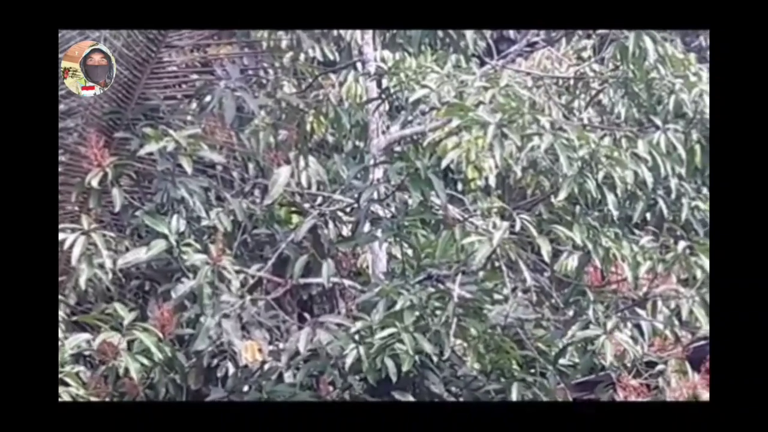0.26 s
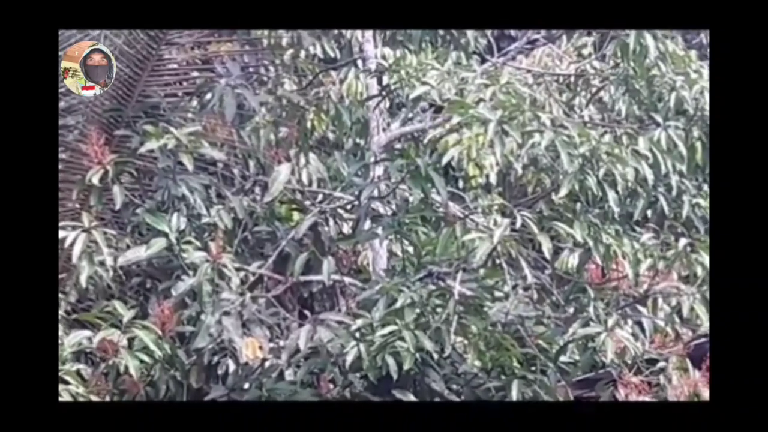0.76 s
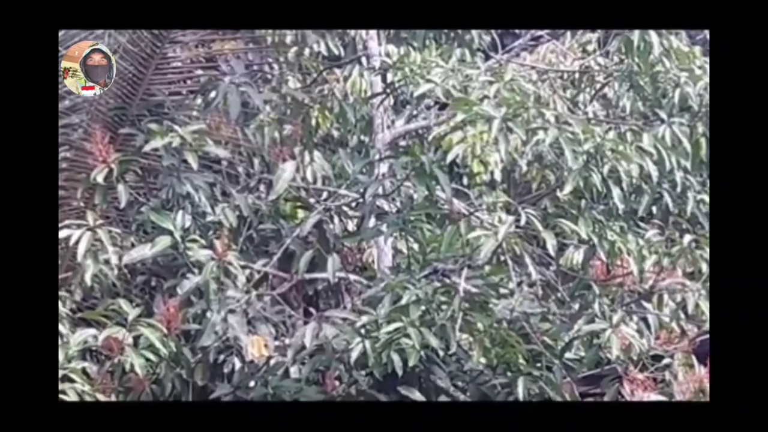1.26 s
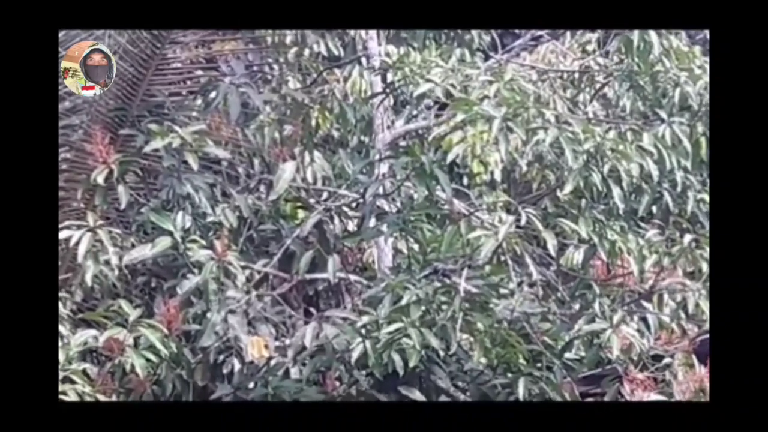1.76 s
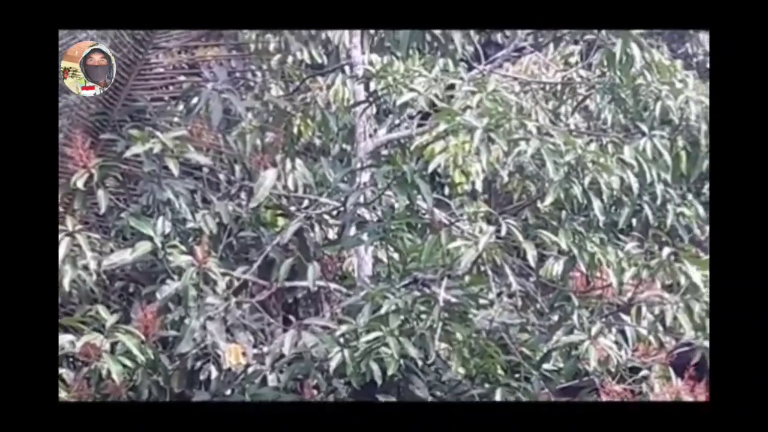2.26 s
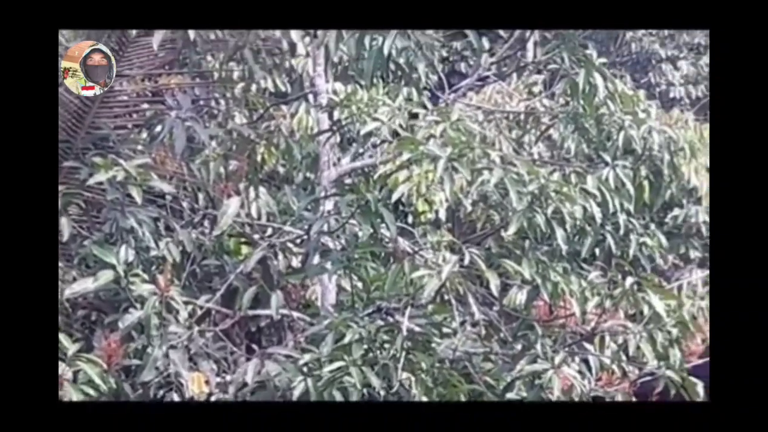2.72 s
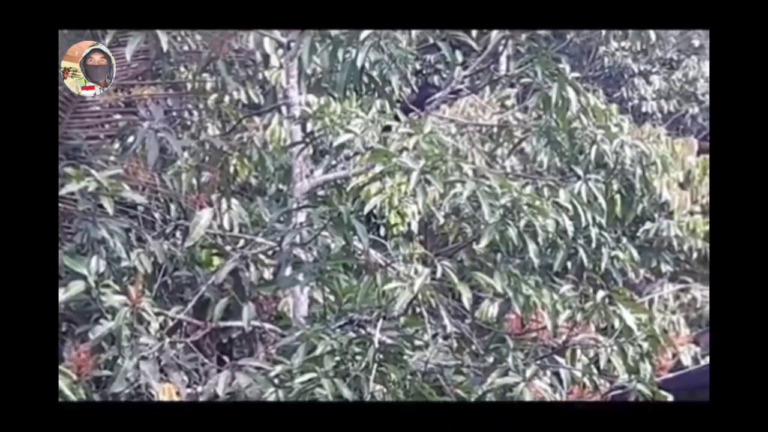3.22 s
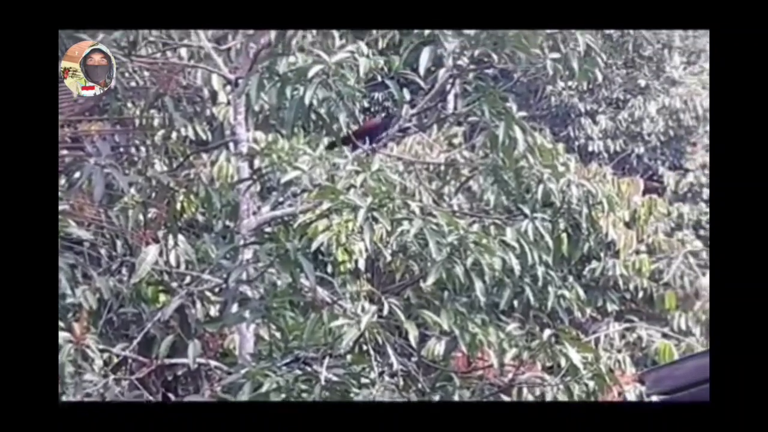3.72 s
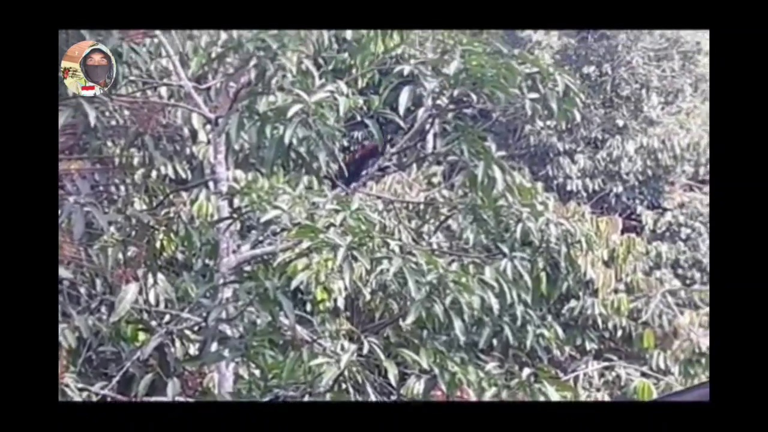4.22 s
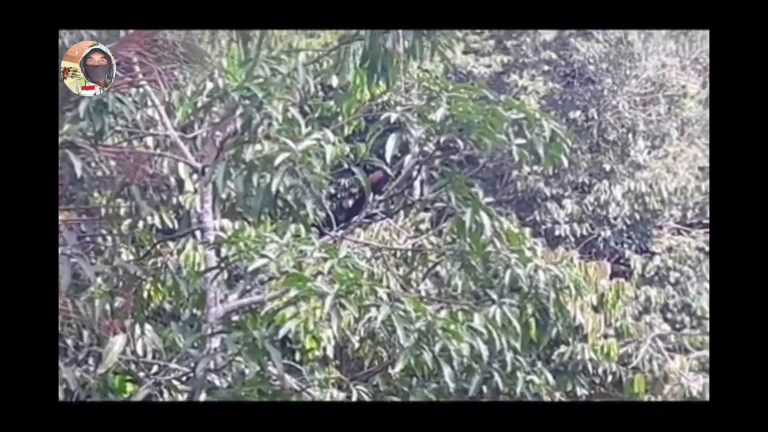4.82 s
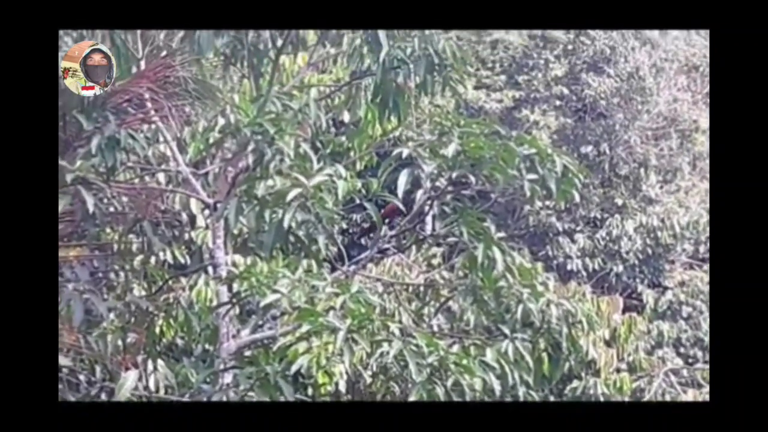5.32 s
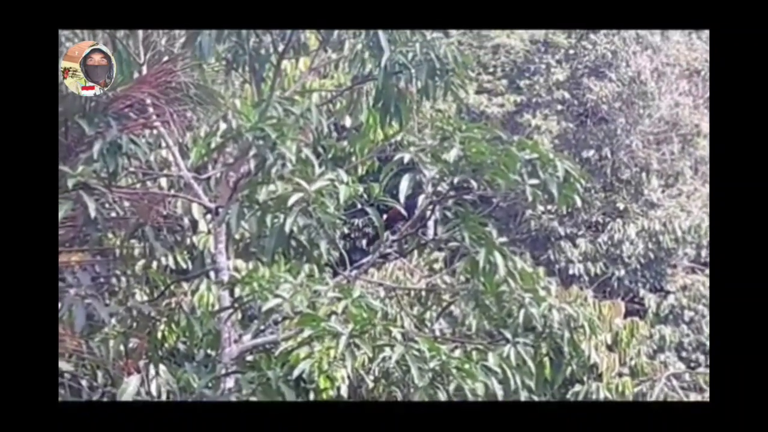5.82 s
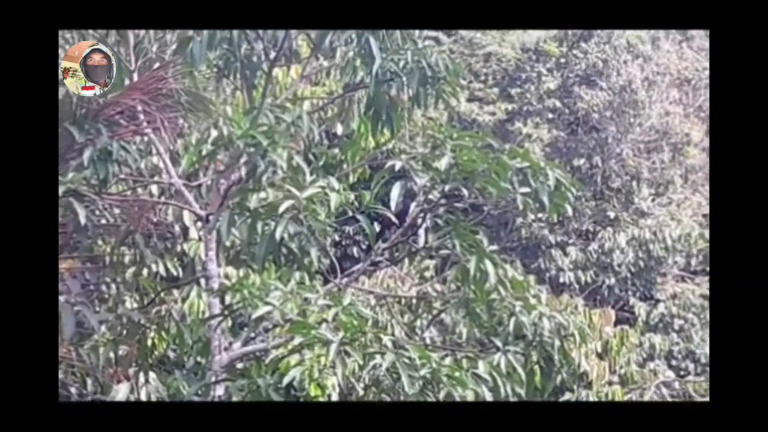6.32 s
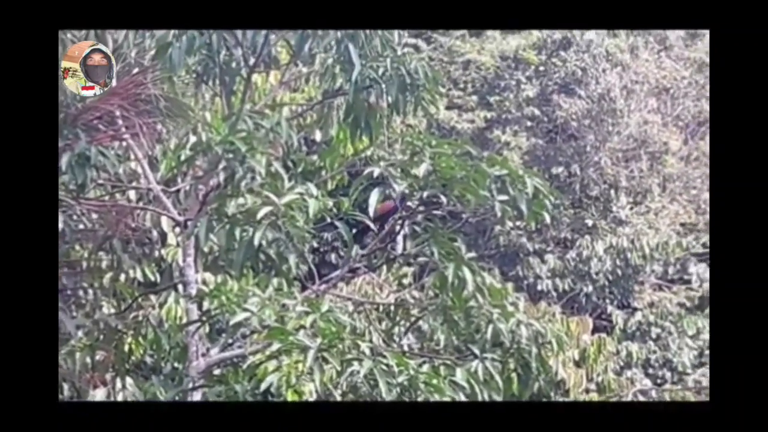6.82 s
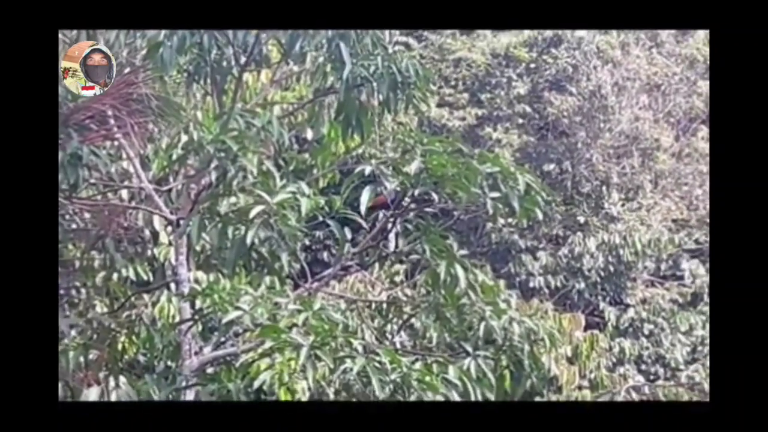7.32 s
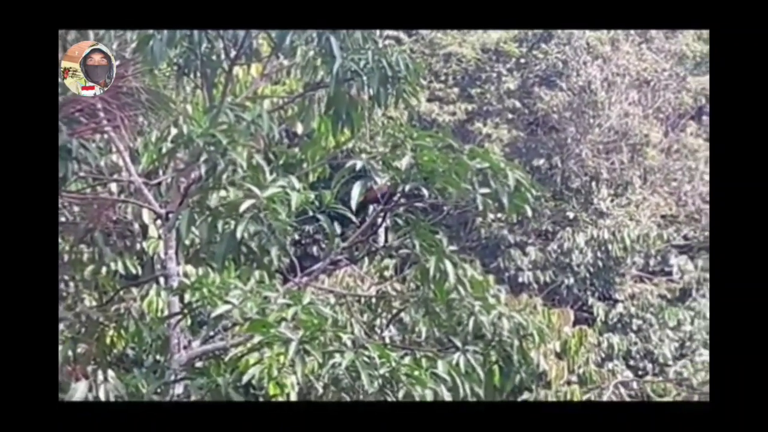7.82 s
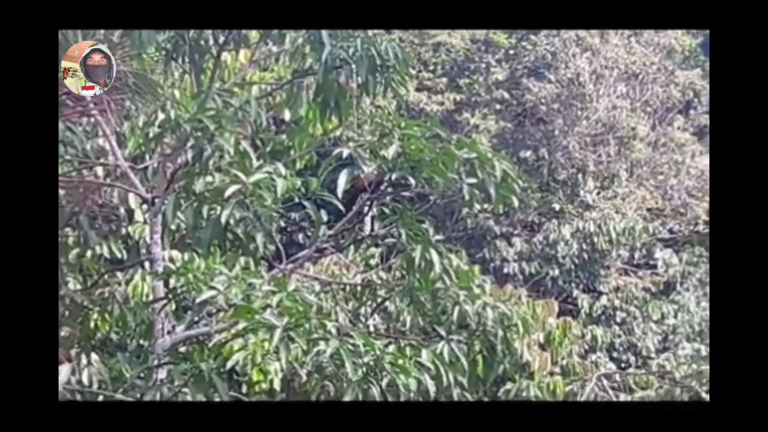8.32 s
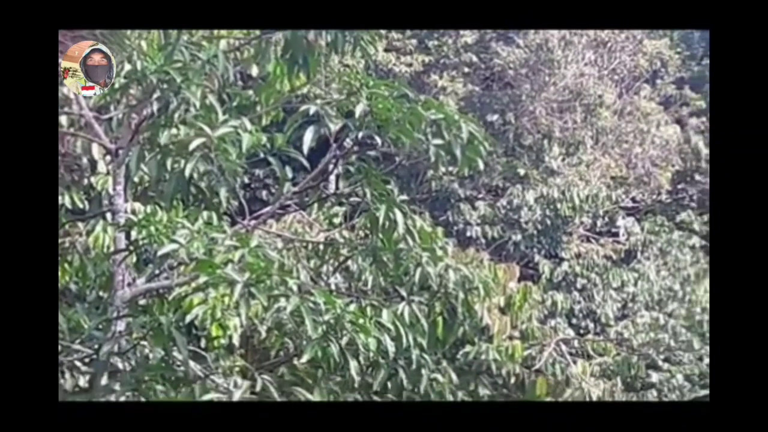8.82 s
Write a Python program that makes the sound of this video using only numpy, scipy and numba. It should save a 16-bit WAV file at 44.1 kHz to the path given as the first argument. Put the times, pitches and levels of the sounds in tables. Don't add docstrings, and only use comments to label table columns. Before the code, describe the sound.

A steady high cicada hiss fills a leafy yard while a nearby bird gives rough falling chirps, distant birds call hoarsely, and a microphone bump thumps late.

```python
import sys
import numpy as np
from scipy import signal
from scipy.io import wavfile
from scipy.ndimage import uniform_filter1d
from numba import njit

SR = 44100
rng = np.random.default_rng(int(sys.argv[2]) if len(sys.argv) > 2 else 0)


def voltage_ratio(decibels):
    exponent = np.asarray(decibels, float) / 20
    return 10 ** exponent


def transcribe(signal):
    frames = np.atleast_2d(signal).T
    limited = np.clip(frames, -1, 1)
    pcm = np.round(limited * 32767).astype(np.int16)
    wavfile.write(sys.argv[1], SR, pcm)


N = 399546
TIME = np.arange(N) / SR

# (time [s], level [dB], left minus right [dB])
CICADA_CHORUS = [(0.0, -45, 2), (0.02, -47.5, -3.5), (1.46, -46.5, -2.5), (6.76, -48.5, -7),
                 (9.03, -47, -5.5), (9.06, -49, -5.5)]
# (bottom of the fall [s], sweep level [dB], landing level [dB], tail [s])
FALLING_CHIRPS = [
    (1.385, -47.5, -53, 0.038),
    (2.655, -49, -50, 0.036),
    (6.41, -48.5, -51.5, 0.1),
    (8.122, -50, -43, 0.034),
]
# (start [s], length [s], first pitch [Hz],
# last pitch [Hz], level [dB])
THIN_WHISTLES = [(1.543, 0.031, 2400, 1680, -55), (3.06, 0.0348, 2700, 1100, -67),
                 (8.33, 0.085, 3090, 3120, -59), (8.33, 0.081, 4400, 3400, -61),
                 (8.325, 0.08, 3660, 3700, -58.5), (8.32, 0.07, 1790, 1815, -64),
                 (5.76, 0.145, 3100, 2800, -67), (0.8, 0.15, 3160, 3140, -65), (3.59, .11, 435, 420, -55),
                 (7.14, .14, 2240, 2400, -64), (8.78, 0.25, 2200, 2200, -66.5),
                 (4.75, 0.6, 1500, 1500, -70.5)]
# (time [s], pitch [Hz], level [dB])
ARCHED_WHISTLE = [(6.015, 2620, -76), (6.036, 2680, -64), (6.152, 2860, -65), (6.19, 2880, -69),
                  (6.28, 2890, -72), (6.4, 2760, -72), (6.47, 2580, -70), (6.53, 2350, -78)]
# (time [s], peak level [dB], throat resonance [Hz])
CHATTER_NOTES = [
    (1.595, -54, 3070),
    (4.6977, -54, 3890),
    (4.9641, -54, 4970),
    (5.018, -51, 3920),
    (5.1267, -51, 3840),
    (5.8855, -52, 3080),
    (6.769, -51, 3970),
    (6.8443, -51.5, 4180),
    (6.9321, -51.5, 3820),
    (7.1327, -59, 3620),
]
# (start [s], length [s], low throat level [dB], low throat [Hz], high throat level [dB])
FAR_CALLS = [(-.1, 0.071, -56, 2250, -64), (0.257, 0.23, -58.5, 2230, -63), (0.698, 0.16, -57, 2110, -60),
             (1.142, 0.21, -56.5, 2225, -63.5), (1.778, 0.32, -57, 2120, -71),
             (2.2, 0.19, -60.5, 2000, -75), (2.698, 0.36, -56.5, 2160, -68), (3.42, 0.3, -58.5, 2050, -73),
             (3.898, 0.32, -60, 2140, -68), (4.446, 0.39, -57.5, 2164, -66), (4.995, 0.27, -69, 2030, -69),
             (5.576, 0.34, -60.5, 2070, -66), (6.115, 0.36, -55, 2160, -62), (6.756, 0.28, -61, 1950, -78),
             (7.13, 0.13, -63, 2240, -74), (7.38, 0.13, -62, 2130, -81), (7.868, 0.23, -60.5, 2040, -75),
             (8.757, 0.26, -69, 2410, -67)]
# (start [s], length [s], level [dB], throat resonance [Hz])
DEEP_CALLS = [(.22, 0.21, -65, 1750), (.65, .2, -65.5, 1770), (1.202, 0.17, -62, 1820),
              (2.2, 0.16, -68, 1800), (3.1, 0.088, -64, 1800), (3.4, 0.23, -66, 1800),
              (4.95, 0.19, -64, 1700), (5.5, 0.27, -66, 1800), (6.75, 0.39, -62.5, 1750),
              (7.85, .25, -65, 1820)]
# (time [s], level [dB], membrane [Hz], edge [ms], port [0 left, 1 right])
CASE_BUMPS = [
    (8.4349, 3, 173, .14, 0),
    (8.9146, -18, 118, 0.21, 0),
    (8.9416, -25, 200, 0.2, 0),
    (3.948, -25.5, 150, 0.52, 1),
    (4.161, -26.5, 150, 0.47, 1),
    (8.126, -34, 150, 0.34, 1),
    (8.212, -46, 70, .8, 1),
]
# (time [s], level [dB])
BREEZE = [(0.0, -63), (0.4, -61), (2.45, -69.5), (3.78, -65), (6.66, -70.5), (6.79, -71.5), (9.06, -70.5)]
# (time [s], level [dB], left minus right
# [dB])
PORT_PUFFS = [(0.0, -56, -12), (.48, -51, 14), (1.0, -64, -18), (1.31, -60, 9), (1.66, -65, -2),
              (2.85, -54, -21), (3.68, -59, 4), (3.83, -59, 7), (3.96, -58, -11), (4.08, -59, -2),
              (4.21, -53.5, 17), (4.62, -61, 7), (4.82, -54, 10), (5.07, -58.5, -9), (5.2, -62, -14),
              (5.43, -57.5, -16), (5.57, -66, -15), (5.8, -67, -18), (6.06, -60, 10), (6.58, -65, 1),
              (7.11, -65, -6), (8.18, -63, -13), (8.45, -62, 10), (8.93, -50.5, 13)]
# (frequency [Hz], level per hertz [dB])
AIR_SPECTRUM = [(60, -12.5), (150, -7.5), (300, -13.5), (600, -7.5), (1100, -17), (1600, -12),
                (3200, -16.5), (5200, -20.5), (6200, -25), (10000, -23.5), (13500, -27), (16000, -11.5)]
# (frequency [Hz], left-right correlation [1])
PORT_LIKENESS = [(60, 0.28), (200, 0.9), (400, 0.64), (800, 0.21), (1100, 0.017), (16000, 0.018)]
# (centre [Hz], width [Hz], level [dB])
HUM_BANDS = [
    (191.8, 77, -61.5),
    (347, 130, -67.5),
    (759, 210, -65),
    (3125, 260, -71),
    (5060, 380, -70),
]
MOTOR_ORDERS = {13: -74, 14: -70, 15: -70, 16: -71.5, 17.5: -74, 20: -77.5, 21: -78.5, 27: -69.5, 28: -78.5,
                29: -81, 31: -80, 32: -77.5}


def cicadas():
    tymbal_hz, width_hz, buckle_hz = 7745, 1570, 24.25
    chorus_db, left_db = columns(CICADA_CHORUS)
    cycle = 2 * np.pi * (buckle_hz * TIME + 0.13 * walk(1.276))
    throb = 1 + 0.073 * np.cos(4 * cycle) + 0.076 * np.cos(3 * cycle) + 0.078 * np.cos(cycle)
    ports = []
    for port in range(2):
        clicks = rng.standard_normal(N) * voltage_ratio(2.0 * rng.exponential(size=N))
        clicks = clicks * throb * voltage_ratio(walk(22))
        ring = steep(clicks, tymbal_hz - 280, width_hz)
        ring = level(steep(ring, tymbal_hz + 280, width_hz), 0)
        octave = level(steep(ring ** 2, 15400, 2200), -28)
        ports.append(ring + octave)
    return pan(np.array(ports) * voltage_ratio(chorus_db), left_db)


def near_birds():
    chirps = song([chirp(*row) for row in FALLING_CHIRPS],
                  hoarse_hz=74, rough=0.31, flutter_db=2.0, overtone_db=-15.5)
    whistles = song([whistle(*row) for row in THIN_WHISTLES] + [ARCHED_WHISTLE],
                    hoarse_hz=55, rough=0.04, flutter_db=2.0, overtone_db=-50)
    return pan(foliage(chirps + whistles + chatter(), wet_db=1.5, t60=0.3), -4.0)


def song(notes, hoarse_hz, rough, flutter_db, overtone_db):
    out = np.zeros(N)
    wobble, flutter = walk(1100), walk(150)
    for note in notes:
        s, hz, db = np.transpose(note)
        on = slice(int(s[0] * SR), int(s[-1] * SR))
        pitch = np.interp(TIME[on], s, hz)
        swing_hz = hoarse_hz + rough * np.minimum(pitch - hz.min(), 1100)
        phase = 2 * np.pi * np.cumsum(pitch + swing_hz * wobble[on]) / SR
        overtones = np.sin(2 * phase) + np.sin(3 * phase) / 2
        tone = np.sin(phase) + voltage_ratio(overtone_db) * overtones
        loudness = voltage_ratio(np.interp(TIME[on], s, db) + flutter_db * flutter[on])
        out[on] += np.sqrt(2) * tone * loudness
    return out


def chirp(s, sweep_db, landing_db, tail):
    fall_s, loud_s, swell_s = 0.13, 0.054, 0.019
    bottom_hz, fall_hz_per_s = 3318, 20000
    lead_db = sweep_db - 15
    when = np.array([-fall_s, -fall_s + swell_s, -loud_s - swell_s, -loud_s,
                     -swell_s / 2, 0, tail / 2, tail])
    db = [lead_db - 3, lead_db, lead_db, sweep_db,
          sweep_db, landing_db, landing_db - 9.0, landing_db - 20]
    hz = bottom_hz - np.where(when < 0, fall_hz_per_s, 900) * when
    return np.transpose([s + when, hz, db])


def whistle(s, length, first_hz, last_hz, db):
    rise, hold = 0.25, 0.46
    share = np.array([0, rise, rise + hold, 1])
    hz = first_hz + (last_hz - first_hz) * share
    return np.transpose([s + length * share, hz, db + np.array([-3, 0, -3, -3])])


def chatter():
    out, noise = np.zeros(N), rng.standard_normal(N)
    t = TIME[:SR // 10]
    puff = t / 0.0092 * np.exp(1 - t / 0.0084)
    for s, db, hz in CHATTER_NOTES:
        i = int(s * SR)
        edges = np.clip([hz - 900, hz + 700], 500, 9000)
        throat = signal.butter(2, edges, "band", fs=SR, output="sos")
        note = signal.sosfilt(throat, puff * noise[i:i + len(t)])
        out[i:i + len(t)] += voltage_ratio(db + 7.0) * note
    return out


def foliage(x, wet_db, t60):
    t = TIME[:SR // 2]
    tails = rng.standard_normal((2, len(t))) * np.exp(-np.log(1000) * t / t60)
    tails *= np.clip(t / 0.0021, 0, 1)
    tails *= voltage_ratio(wet_db) / np.sqrt(np.sum(tails ** 2, axis=1, keepdims=True))
    return x + np.array([signal.fftconvolve(x, tail)[:N] for tail in tails])


def far_birds():
    s, length, low_db, hz, high_db = np.transpose(FAR_CALLS)
    shapes = np.array([swell(a, b) for a, b in zip(s, length)])
    sag_hz = 77 * length / 2
    ends = np.ravel([s, s + length], "F")
    low_hz = np.interp(TIME, ends, np.ravel([hz + sag_hz, hz - sag_hz], "F"))
    high_hz = 4570 * voltage_ratio(0.17 * walk(3.01))

    s, length, db, hz = np.transpose(DEEP_CALLS)
    deep = voltage_ratio(db) @ np.array([swell(a, b) for a, b in zip(s, length)])
    deep_hz = np.interp(TIME, s, hz)
    out = deep * level(np.array([steep(n, deep_hz, 410) for n in pair(0.1)]), 0)

    for hz, db, width_hz in ((low_hz, low_db, 280), (high_hz, high_db - 1.5, 600)):
        throb = voltage_ratio(2.5 * walk(35))
        voice = level(np.array([steep(n * throb, hz, width_hz) for n in pair(0.086)]), 0)
        murmur = voltage_ratio(-73)
        out = out + (voltage_ratio(db) @ shapes + murmur) * voice
    return pan(out, -2.5)


def swell(s, length):
    attack_s, release_s = 0.06, 0.19
    corners = [s - attack_s, s, s + length, s + length + release_s]
    return np.interp(TIME, corners, [0, 1, 1, 0]) ** 2


def handling():
    out = np.zeros((2, N))
    t = np.arange(-400, 1400) / SR
    for s, db, hz, edge_ms, port in CASE_BUMPS:
        suction = 0.31 + 0.6 * voltage_ratio(db)
        late = t - (s * SR % 1) / SR
        swing = np.cos(2 * np.pi * hz * late) * np.exp(-np.abs(late) * hz / 0.23)
        pull = suction * np.exp(-np.abs(late) * 1000 / (2.2 * edge_ms))
        pull = pull + 0.085 * np.exp(-np.abs(late) / 0.0011)
        edge = np.exp(-.5 * (t[300:501] * 1000 / edge_ms) ** 2)
        shape = np.convolve(np.where(late > 0, swing, -pull), edge / edge.sum(), "same")
        snap = np.sin(2 * np.pi * 4200 * late) * np.exp(-np.abs(late) / 0.00016)
        shape = shape + voltage_ratio(-35) * snap
        i = int(s * SR) - 400
        out[int(round(port)), i:i + len(t)] += voltage_ratio(db) * shape

    tick_s, tick_db = 5.9134, -16
    t = TIME[:300]
    tick = 0
    # frequency [Hz], level [dB], decay [s]
    for hz, db, tau in ((11200, 8.0, 0.00014), (7860, -6.5, 0.00083), (4500, -20, 0.00016)):
        tick = tick + voltage_ratio(db) * np.sin(2 * np.pi * hz * t) * np.exp(-t / tau)
    i = int(tick_s * SR)
    out[:, i:i + len(t)] += voltage_ratio(tick_db) * tick * voltage_ratio(np.array([[-22], [0]]))
    return out


def wind():
    gain = pan(voltage_ratio(columns(BREEZE)[0] + 3.5), -3 + 4 * walk(5.01))
    for s, db, left_db in PORT_PUFFS:
        puff_db = db + np.array([[.5], [-.5]]) * left_db
        gain = gain + voltage_ratio(puff_db) * np.exp(-np.abs(TIME - s) / 0.03)
    eddies = []
    for port in range(2):
        gusts = rng.standard_normal(N) * voltage_ratio(2.6 * walk(14))
        eddies.append(steep(gusts, 68 * voltage_ratio(1.4 * walk(2.67)), 109))
    rumble_cut = signal.butter(2, 45, "high", fs=SR, output="sos")
    return level(signal.sosfilt(rumble_cut, eddies), 0.65) * gain


def yard():
    air_hz, air_db = np.transpose(AIR_SPECTRUM)
    like_hz, likeness = np.transpose(PORT_LIKENESS)
    out = 0
    for hz in 60 * 2 ** np.arange(0, 8.1, .5):
        db = np.interp(np.log(hz), np.log(air_hz), air_db) + walk(8)
        like = np.interp(np.log(hz), np.log(like_hz), likeness)
        out = out + voltage_ratio(db) * np.array([steep(n, hz, hz * 0.69) for n in pair(like)])
    out = level(out, 8.23) * voltage_ratio(-63 + .5 * walk(2.13))
    for hz, width_hz, db in HUM_BANDS:
        noises = pair(min(180 / hz, .9))
        hum = np.array([steep(n, hz * voltage_ratio(0.29 * walk(0.632)), width_hz) for n in noises])
        out = out + level(hum, db)
    return pan(out + motor(), -3)


def motor():
    firing_hz = 12.52 * (1 + 0.00094 * walk(0.682))
    turn = 2 * np.pi * np.cumsum(firing_hz) / SR
    out = 0
    for k, db in MOTOR_ORDERS.items():
        out = out + voltage_ratio(db + 2.7 * walk(1.5)) * np.sqrt(2) * np.sin(k * turn + k * k)
    return out


def level(x, db):
    return x * voltage_ratio(db) / np.sqrt(np.mean(x ** 2))


def columns(table):
    s, *cols = np.transpose(table)
    return [np.interp(TIME, s, c) for c in cols]


def pan(x, left_db):
    return x * voltage_ratio(np.multiply.outer([.5, -.5], left_db + np.zeros(N)))


@njit
def svf(x, hz, width):
    y, band, low = np.empty(len(x)), 0., 0.
    for i in range(len(x)):
        g, k = np.tan(np.pi * hz[i] / SR), width / hz[i]
        v = (band + g * (x[i] - low)) / (1 + g * (g + k))
        band = 2 * v - band
        low = low + 2 * g * v
        y[i] = k * v
    return y


def steep(x, hz, width_hz):
    hz = hz + np.zeros(N)
    return svf(svf(x + 1e-18, hz, 1. * width_hz), hz, 1. * width_hz)


def walk(rate):
    k = int(SR / rate)
    held = np.repeat(rng.standard_normal(N // k + 1), k)
    return 1.3 * uniform_filter1d(uniform_filter1d(held, k), k)[:N]


def pair(likeness):
    mid, side = rng.standard_normal((2, N))
    c = np.clip(likeness, 0, .99)
    return np.sqrt((1 + c) / 2) * mid + np.sqrt((1 - c) / 2) * side * np.array([[1], [-1]])


def scene():
    return cicadas() + far_birds() + near_birds() + wind() + yard() + handling()


def band_limit(x):
    return signal.sosfilt(signal.butter(12, 16800, fs=SR, output="sos"), x)


def record(dry):
    over = np.roll(np.abs(dry).max(axis=0) > 0.3, SR // 150)
    recover_s, duck_db = 0.048, -8.5
    dip = signal.lfilter([1], [1, -np.exp(-1 / (recover_s * SR))], over)
    ducked = dry * voltage_ratio(duck_db * dip / dip.max())
    top_cut = signal.ellip(10, .2, 45, 15580, fs=SR, output="sos")
    return band_limit(signal.sosfilt(top_cut, ducked))


dry = scene()
out = record(dry)
transcribe(out)
```